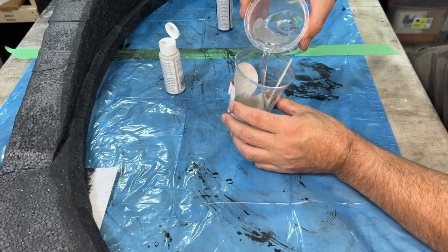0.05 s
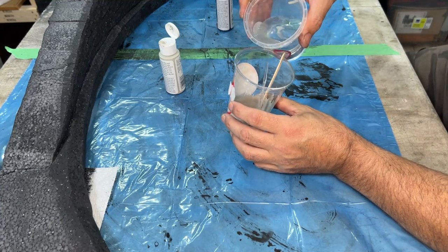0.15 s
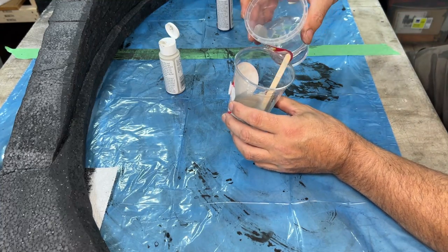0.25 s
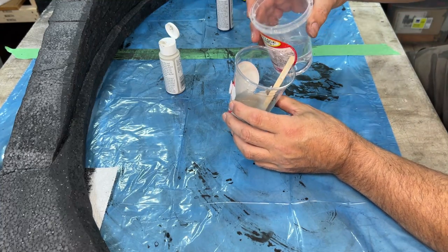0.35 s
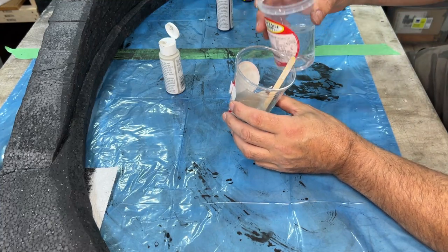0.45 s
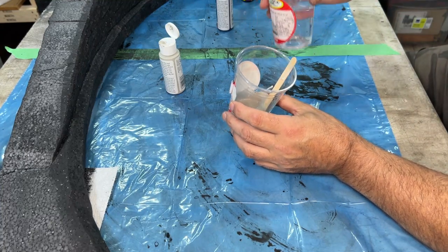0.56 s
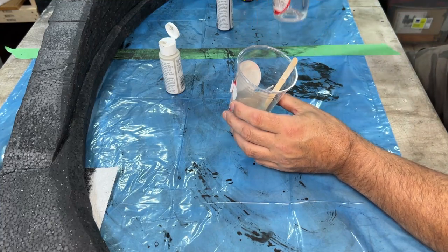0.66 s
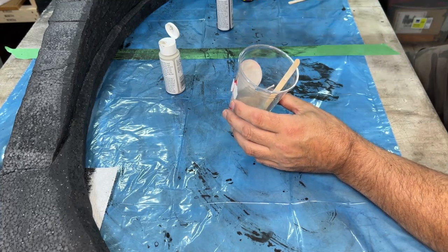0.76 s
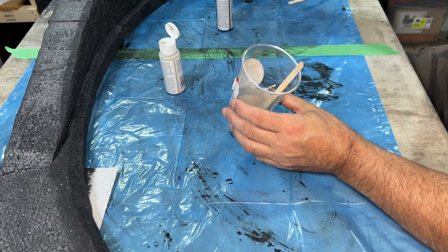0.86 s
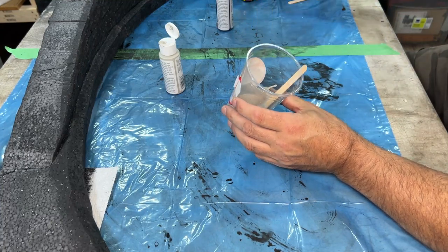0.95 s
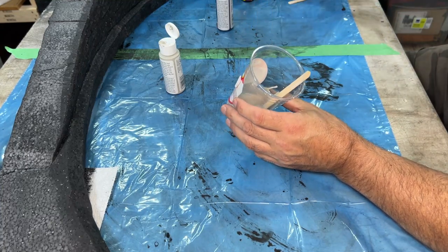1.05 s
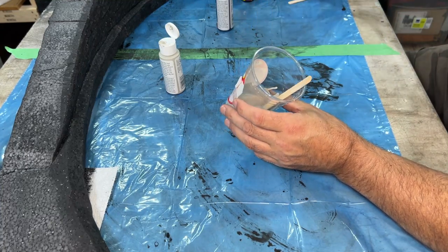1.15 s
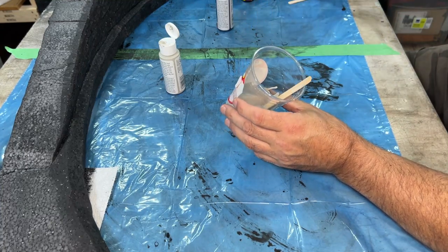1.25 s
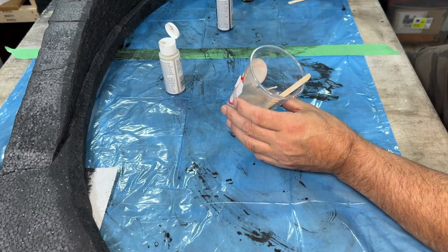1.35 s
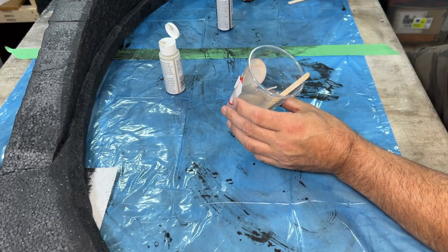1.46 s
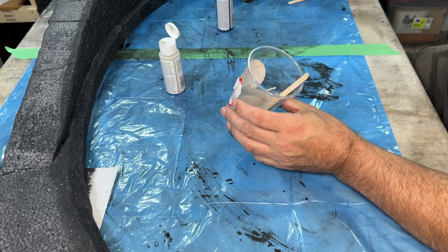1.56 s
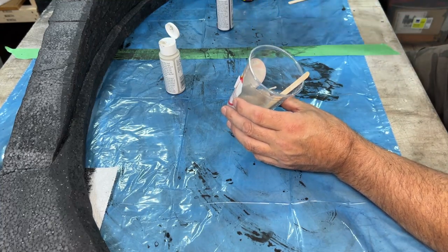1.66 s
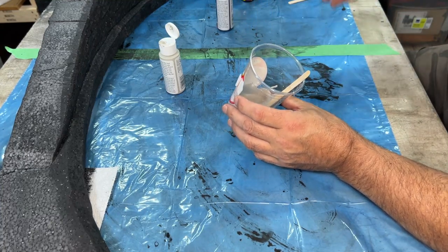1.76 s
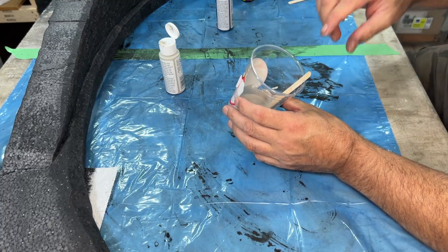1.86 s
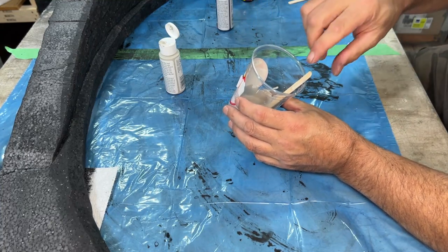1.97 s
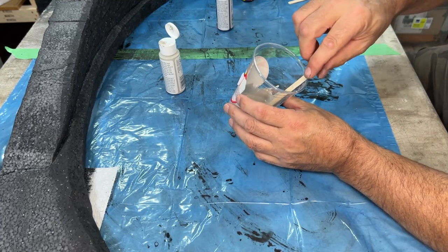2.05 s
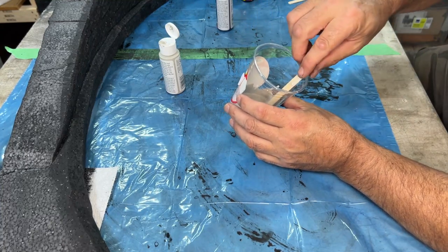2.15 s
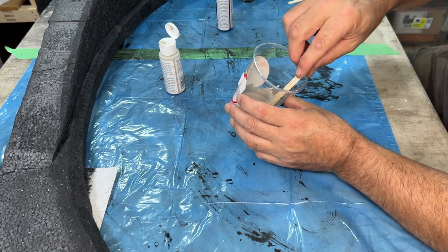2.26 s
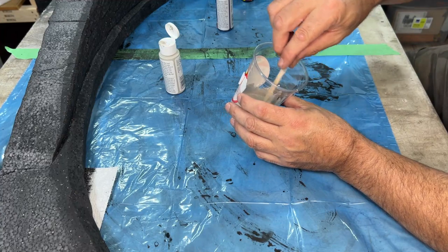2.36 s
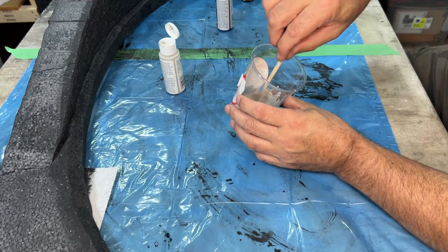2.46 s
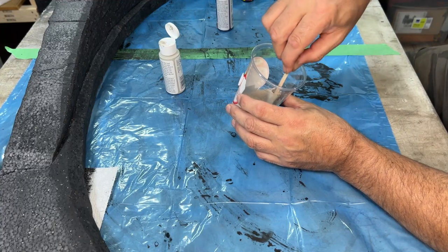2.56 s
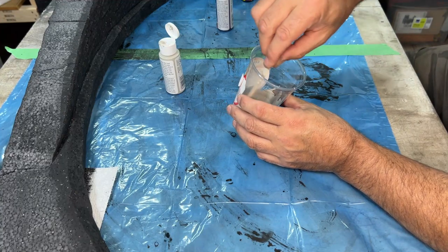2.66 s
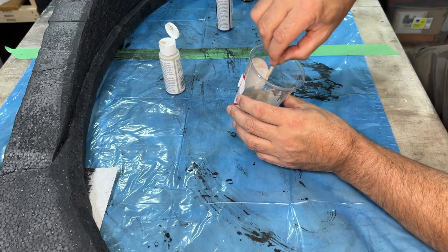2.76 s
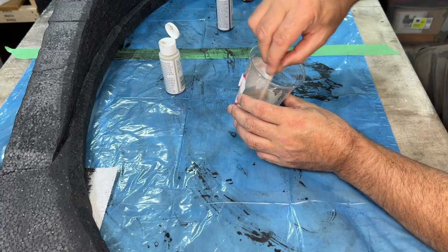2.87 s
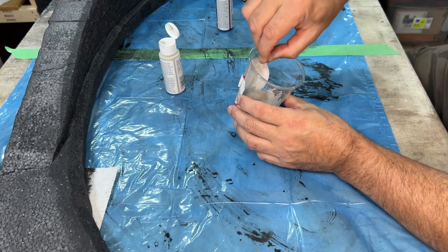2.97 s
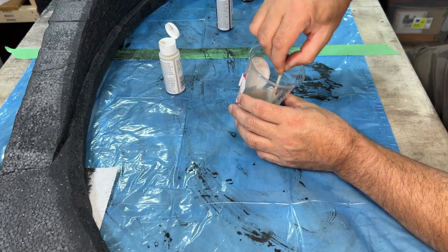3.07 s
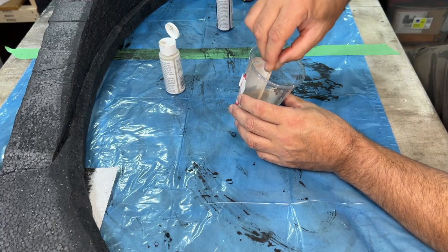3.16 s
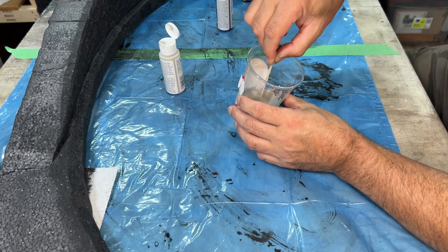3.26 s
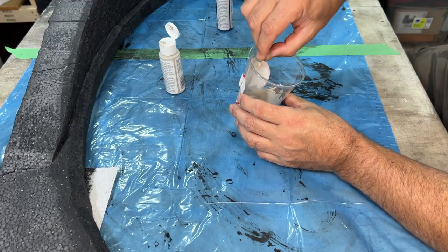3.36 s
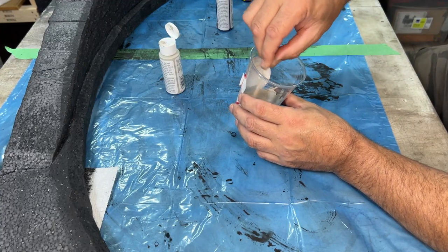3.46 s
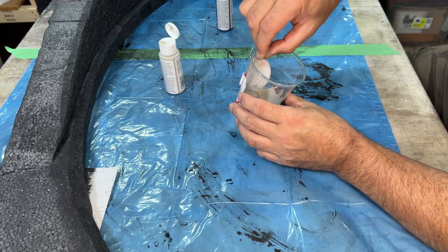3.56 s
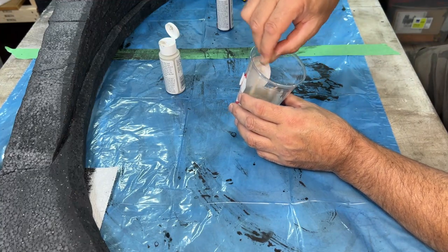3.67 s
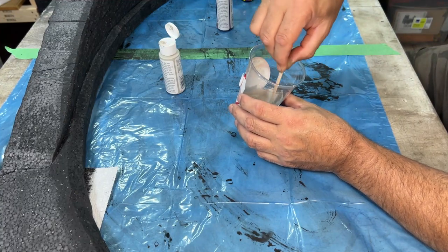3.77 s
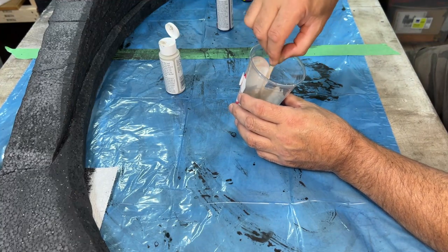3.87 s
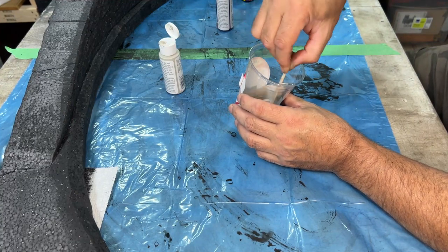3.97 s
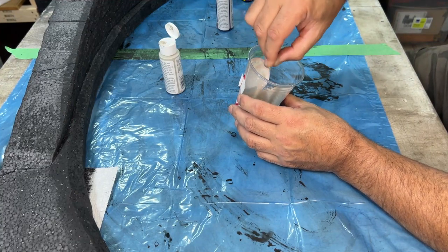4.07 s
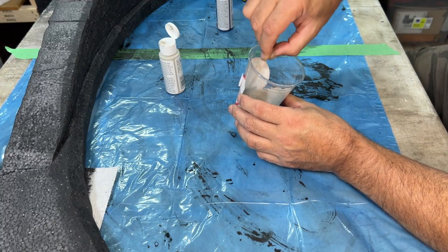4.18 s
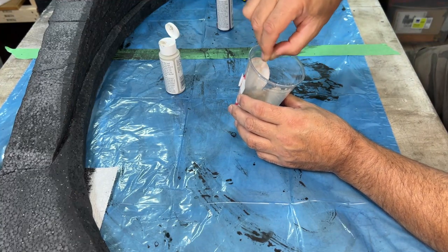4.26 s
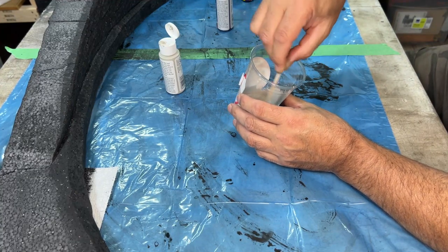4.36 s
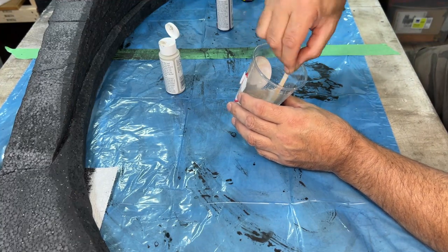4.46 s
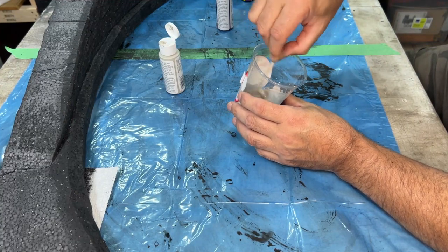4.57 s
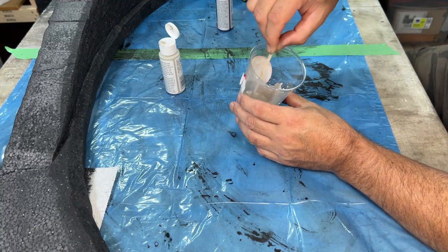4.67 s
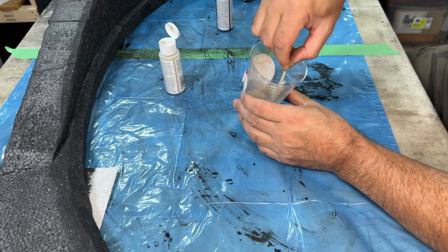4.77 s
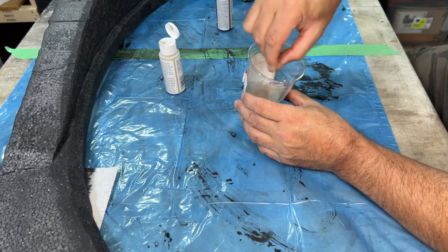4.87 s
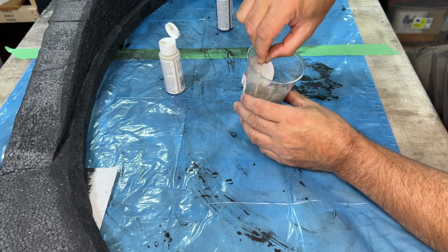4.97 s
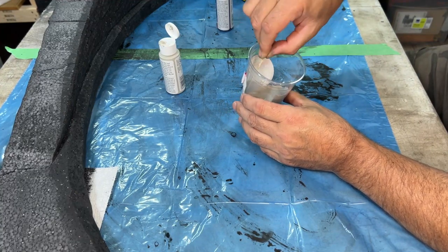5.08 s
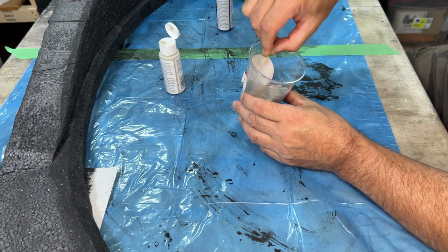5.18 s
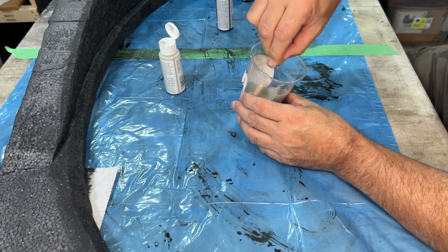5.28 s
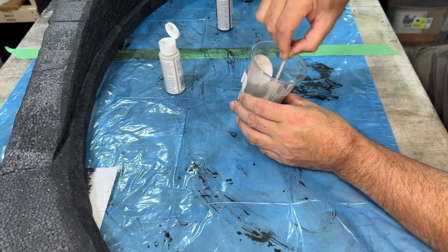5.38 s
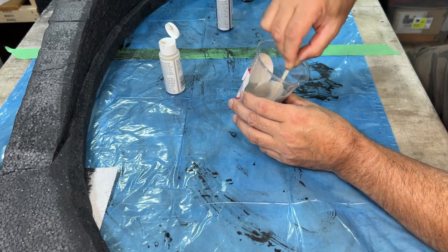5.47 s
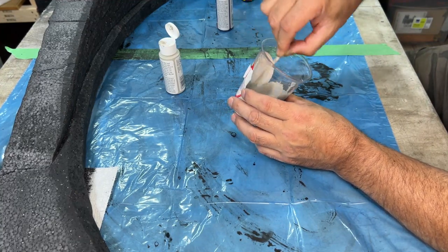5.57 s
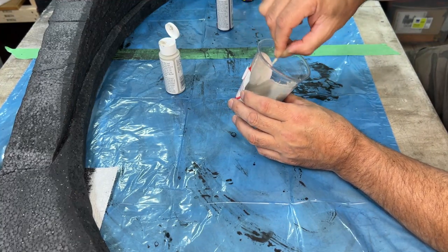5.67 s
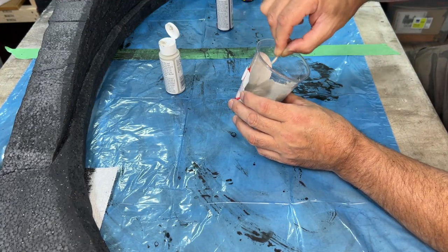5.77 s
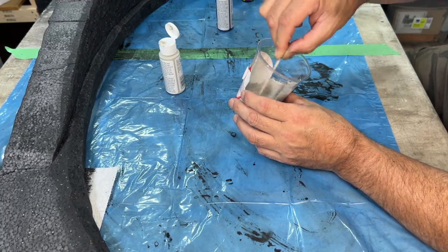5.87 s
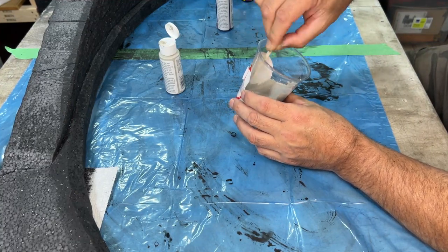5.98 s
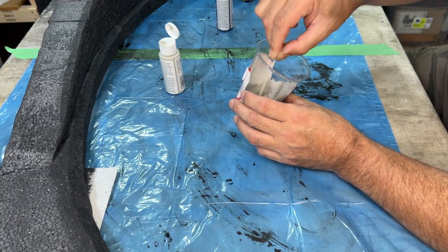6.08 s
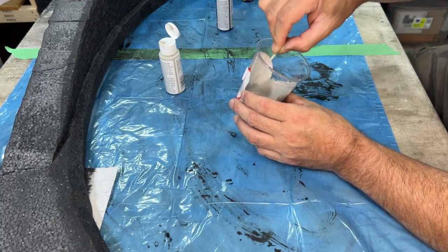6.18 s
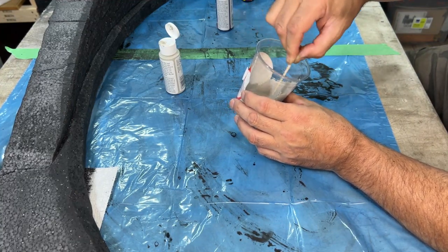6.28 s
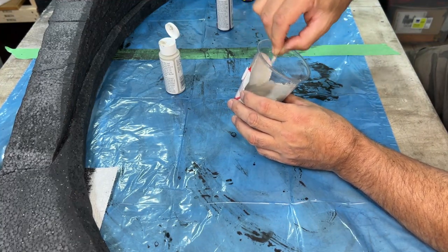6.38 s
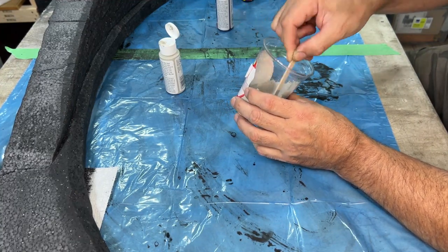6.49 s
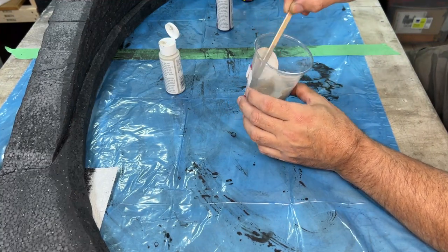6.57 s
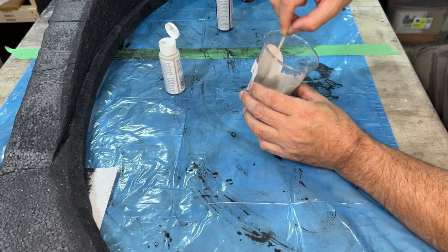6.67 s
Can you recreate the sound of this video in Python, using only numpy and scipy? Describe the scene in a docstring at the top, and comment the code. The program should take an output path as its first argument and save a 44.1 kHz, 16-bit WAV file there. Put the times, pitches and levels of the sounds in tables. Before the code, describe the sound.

In a workshop with a low wavering hum and faint hiss, plastic cup rims tick together a few times, then a dull thud booms on a bench and something scrapes twice. A wooden stick then stirs thin paint in a plastic cup with small hollow knocks, gritty rubs, tiny wet blips and bright ticks. Close, quiet stereo, with a slight short room echo.

```python
"""Stirring paint in a plastic cup

In a humming workshop a wooden stick stirs thin paint in a hand-held plastic cup, heard in stereo.
First the emptied second cup clicks on the rim, is set down with a thud, and something slides twice on a bench.
Then the stick knocks and rubs: touches and grit ring the cup wall's modes and the air in the cup.
Blips and bright ticks of wet paint come in between; hum and hiss are shaped noise."""
import sys
import numpy as np
from scipy import signal
from scipy.fft import rfft, irfft, next_fast_len
from scipy.io import wavfile
from scipy.ndimage import uniform_filter1d

SR = 44100
rng = np.random.default_rng(int(sys.argv[2]) if len(sys.argv) > 2 else 0)


def int16_out(signal):
    """Quantize to a 16-bit WAV file."""
    q = np.round(np.clip(np.atleast_2d(signal).T, -1, 1) * 32767)
    wavfile.write(sys.argv[1], SR, q.astype(np.int16))


N = 296735

# resonances of the plastic cup wall: f/Hz, level/dB, t60/s
CUP_WALL_MODES = [(355, -15, 0.012), (1480, -5.5, 0.0067), (2005, 1.5, 0.007), (2215, -4.5, 0.031),
                  (2445, 1.5, 0.014), (3030, 3.5, 0.0061), (3320, -3.5, 0.016), (3448, -0.5, 0.022),
                  (3860, 1, 0.0067), (4410, -23, 0.1), (4540, -30, .01), (6770, -3.5, 0.0076)]
# strokes of the stick along the wall: t/s, length/s, level/dB
STICK_STROKES = [(2.499, 0.14, -59), (2.818, 0.06, -49), (2.915, 0.19, -52.5), (3.118, 0.077, -58.5),
                 (3.307, 0.12, -54), (3.444, 0.07, -51.5), (3.515, .079, -48), (3.636, 0.043, -45.5),
                 (3.725, 0.057, -48.5), (3.848, 0.018, -48.5), (3.953, 0.034, -47), (4.04, 0.0082, -42.5),
                 (4.122, .032, -57), (4.19, 0.019, -44), (4.318, .045, -51), (4.4, 0.046, -50),
                 (4.486, 0.029, -45), (4.554, .018, -46.5), (4.638, 0.021, -49.5), (4.682, 0.0243, -52),
                 (4.77, 0.12, -49), (4.941, 0.016, -54.5), (5.028, .022, -53), (5.068, 0.031, -56.5),
                 (5.131, 0.11, -56.5), (5.225, 0.023, -48.5), (5.289, 0.052, -55), (5.479, 0.014, -50.5),
                 (5.582, 0.1, -47), (5.751, 0.0095, -51.5), (5.906, 0.016, -53.5), (6.011, 0.055, -49.5),
                 (6.145, 0.013, -48), (6.337, 0.064, -53.5), (6.452, 0.058, -49), (6.709, .028, -56)]


def amp(db):
    """Decibels to amplitude."""
    return 10 ** (np.asarray(db) / 20)


def rms_one(x):
    """Scales a signal to rms 1."""
    return x / np.sqrt(np.mean(x ** 2) + 1e-20)


def in_time(rows):
    """A curve of (t/s, value) rows at every sample."""
    return np.interp(np.arange(N) / SR, *np.transpose(rows))


def at_hz(points, hz):
    """A curve of (f/Hz, value) points, read along log frequency."""
    points_hz, values = np.transpose(points)
    return np.interp(np.log(hz), np.log(points_hz), values)


def drift(rate_hz):
    """Slow chance of spread 1: noise through two equal low-pass poles, made at every 40th sample."""
    r = np.exp(-80 * np.pi * rate_hz / SR)
    slow = signal.lfilter([1], [1, -2 * r, r * r], rng.standard_normal(N // 40 + 2002))
    slow = rms_one(slow[2000:])   # skip the filter's start
    return np.interp(np.arange(N) / 40, np.arange(len(slow)), slow)


def ring(clicks, hz, t60):
    """A resonance: a unit click sets a dying sine of height 1 ringing."""
    r = amp(-60 / (t60 * SR))
    w = 2 * np.pi * hz / SR
    return signal.lfilter([0, np.sin(w)], [1, -2 * r * np.cos(w), r * r], clicks + 1e-18)


def band_pass(x, low_hz, high_hz):
    """Keeps one pitch region."""
    return signal.sosfilt(signal.butter(2, [low_hz, high_hz], "band", fs=SR, output="sos"), x)


def bright(x, low_hz):
    """Keeps what lies above low_hz."""
    return signal.sosfilt(signal.butter(2, low_hz, "high", fs=SR, output="sos"), x)


def coloured(x, spectrum):
    """Shapes a long steady signal to a spectrum in dB per Hz; rms 1."""
    size = next_fast_len(N)
    hz = np.maximum(np.arange(size // 2 + 1) * SR / size, 1)
    return rms_one(irfft(rfft(x, size) * amp(at_hz(spectrum, hz)), size)[..., :N])


def patchy(x, edges_hz, spread_db, rate_hz):
    """Each pitch region between the edges flickers in its own way."""
    return sum(amp(spread_db * drift(rate_hz)) * band_pass(x, low, high)
               for low, high in zip(edges_hz, edges_hz[1:]))


def stereo_noise():
    """White noise, alike left and right in the bass, much less so above and partly opposed at the top."""
    # left-right likeness: f/Hz, correlation
    likeness = [(40, 0.93), (120, 0.94), (300, 0.71), (800, 0.051), (3000, 0.2), (8000, -0.088),
                (14000, -0.34)]
    size = next_fast_len(N)
    mid, side = rfft(rng.standard_normal((2, size)))
    hz = np.maximum(np.arange(len(mid)) * SR / size, 1)
    alike = np.clip(at_hz(likeness, hz), -1, 1)
    return irfft(np.sqrt(1 + alike) * mid + np.sqrt(1 - alike) * side * [[1], [-1]], size)[:, :N]


def grit(smooth):
    """Stereo noise of uneven tiny contacts, over an even share set by smooth; rms 1."""
    lumps = uniform_filter1d(1.0 * (rng.random(N) < .05), size=12)
    return rms_one(stereo_noise() * (lumps + smooth * lumps.mean()))


def stroke_shape(rows, rise_s, fall_db_s):
    """Each stroke swells by 10 dB per rise_s, holds and dies away; overlapping strokes add in power."""
    t, power = np.arange(N) / SR, np.zeros(N)
    for s, length_s, db in rows:
        at = slice(round((s - .03) * SR), round((s + length_s + .3) * SR))
        before = np.maximum(s - t[at], 0)
        after = np.maximum(t[at] - s - length_s, 0)
        power[at] += amp(db - 10 * before / rise_s - fall_db_s * after) ** 2
    return np.sqrt(power)


def contact(length_s, alike, rise):
    """A blow as a short flurry of touches that swells and dies, partly different at each ear; energy 1."""
    t = np.arange(1800) / SR / max(length_s, 2e-4)   # in lengths of the blow
    both, left, right = rng.standard_normal((3, 1800))
    flurry = (alike * both + np.array([left, right])) * np.exp(-t) * (1 - np.exp(-t / rise))
    return flurry / np.sqrt(np.mean(np.sum(flurry ** 2, axis=1)))


def cup_air(push):
    """The air column above the paint, ringing at its own modes."""
    # f/Hz, level/dB, t60/s
    air_modes = [(782, -20, 0.19), (857.4, 4.5, 0.056), (919, -2, 0.046), (973, -15.5, 0.081)]
    return sum(amp(db) * ring(push, hz, t60) for hz, db, t60 in air_modes)


def blows(rows, modes, fall_db_octave, scatter_db, alike, rise, pan_db, slap_db):
    """Rows (s, dB, Hz, air dB, treble dB, s): modes near the blow's own pitch ring most, over a broad slap."""
    hz, level_db, t60 = np.transpose(modes)
    body = np.zeros((len(hz), 2, N + 1800))
    air, top, slap = np.zeros((3, 2, N + 1800))
    for s, db, centre_hz, air_db, top_db, length_s in rows:
        at = slice(round(s * SR), round(s * SR) + 1800)
        hit = contact(length_s, alike, rise) * amp(db + pan_db / 2 * np.array([[1], [-1]]))
        near_db = -np.minimum(fall_db_octave * abs(np.log2(hz / centre_hz)), 16)
        near_db = near_db + rng.normal(0, scatter_db, len(hz))
        body[:, :, at] += amp(level_db + near_db)[:, None, None] * hit
        air[:, at] += amp(air_db) * hit
        top[:, at] += amp(top_db) * hit
        broad = signal.butter(1, [centre_hz / 2, centre_hz * 2], "band", fs=SR)
        slap[:, at] += amp(slap_db) * signal.lfilter(*broad, hit)
    ringing = sum(ring(push, f, decay) for push, f, decay in zip(body, hz, t60))
    return (ringing + cup_air(air) + bright(top, 8900) + slap)[:, :N]


def room_tone():
    """A wavering low hum of machines and a faint hiss in two layers, each noise of a fixed colour."""
    # spectra: f/Hz, level/dB per Hz
    hum_colour, hiss_colour, top_colour = [(15, -55), (25, -24), (41, -11), (63, 3), (85, -3), (115, -7),
                                           (150, -11), (178, -9.5), (210, -15.5), (255, -18), (310, -22.5),
                                           (403, -21.5), (600, -31.5), (900, -49.5)], [(290, -47), (500, -7), (900, 1), (1130, -0.5),
                                                           (1700, -9.5), (2200, -7), (2500, -10.5),
                                                           (2850, -7), (4300, -11), (4870, -6.5),
                                                           (5400, -15), (7000, -17), (9090, -21),
                                                           (12900, -46), (16000, -40)], [(8000, -42), (10500, -6),
                                                                         (12000, 13), (14500, 1),
                                                                         (16000, -9)]
    # levels: t/s, level/dB
    hum_level, hiss_level, top_level = [(0, -49.5), (.58, -52), (1.1, -45.5), (1.45, -53.5), (1.63, -48.5),
                                        (4.8, -49.5), (6.73, -45)], [(0, -50), (.11, -61.5), (.25, -53), (.5, -69),
                                                              (.7, -61.5), (1.57, -64), (1.8, -67.5),
                                                              (2.35, -66), (3.0, -57.5), (3.5, -64),
                                                              (4.5, -58), (5.4, -67.5), (6.73, -62)], [(0, -67), (.45, -81),
                                                                                  (.7, -67), (1.3, -72),
                                                                                  (1.8, -71.5), (2.4, -92),
                                                                                  (2.55, -60), (2.75, -87),
                                                                                  (3.0, -67), (3.6, -68),
                                                                                  (4.3, -100), (6.73, -80)]
    hum = amp(in_time(hum_level) + 1.5 * drift(3.4)) * coloured(stereo_noise(), hum_colour)
    top = amp(in_time(top_level) + 1.5 * drift(7.2)) * coloured(stereo_noise(), top_colour)
    hiss = amp(in_time(hiss_level) + 0.63 * drift(13)) * coloured(stereo_noise(), hiss_colour)
    return hum + top + hiss


def slide():
    """Two pushes across the bench: friction noise, with the narrow rings of the sliding thing on top."""
    # pushes: t/s, length/s, level/dB
    pushes = [(1.915, 0.12, -39), (2.135, .07, -40.5)]
    # friction spectrum: f/Hz, level/dB per Hz
    friction_colour = [(88, -26), (150, 2.5), (286, -2.5), (821, -4), (1020, -22), (1340, 6), (1660, 2.5),
                       (4670, -2.5), (7500, -11), (10000, -18), (11500, -15), (16000, -16)]
    # rings: f/Hz, width/Hz, level/dB
    narrow_rings = [(900, 48, -3.5), (1420, 310, 6.5), (2120, 17, -6), (3090, 19, -6.5), (4710, 37, -4),
                    (5820, 24, -5)]
    rough = grit(smooth=3.0)
    rings = sum(amp(db) * rms_one(ring(rough, hz, np.log(1000) / np.pi / width))   # width to t60
                for hz, width, db in narrow_rings)
    shape = stroke_shape(pushes, rise_s=0.009, fall_db_s=129) * amp(0.58 * drift(33))
    return shape * (coloured(rough, friction_colour) + amp(-12) * rings)


def thud():
    """The cup set down: a knock rings bench and room, with a boom of noise that dies band by band."""
    # boom spectrum: f/Hz, level/dB per Hz
    boom_colour = [(40, -10), (80, -6.5), (124, 1), (250, -2), (480, -1.5), (800, -20), (1300, -9),
                   (1800, -24), (2700, -37.5), (3850, -52), (8000, -59)]
    # boom decay: f/Hz, t60/s
    boom_t60 = [(50, 0.58), (130, 0.63), (350, 0.44), (920, 0.26), (2430, 0.61)]
    # modes of bench and room: f/Hz, level/dB, t60/s
    bench_modes = [(61.4, -23.5, 0.37), (122, -28, 0.24), (180, -28, 0.23), (251.3, -24.5, 0.26),
                   (390, -16, 0.023), (475, -22.5, 0.13), (1240, -15.5, 0.012), (2040, -28.5, 0.021),
                   (2780, -24.5, 0.012)]
    start_s, noise_db = 1.157, -5
    start, out = round(start_s * SR), np.zeros((2, N))
    t = np.arange(SR) / SR
    click = np.zeros(SR)
    click[60:75] = np.hanning(15) / 7   # a soft-edged contact
    boom = sum((-1) ** k * amp(db) * ring(click, hz, t60) for k, (hz, db, t60) in enumerate(bench_modes))
    white = stereo_noise()[:, :SR] * np.array([[amp(.7)], [amp(-.7)]])   # left a little louder
    edges_hz = 35 * 2 ** np.arange(0, 8.1, 1 / 3)   # third-octave bands
    for low, high in zip(edges_hz, edges_hz[1:]):
        hz = np.sqrt(low * high)
        shape = (1 - np.exp(-t * hz / 0.31)) * amp(-60 * t / at_hz(boom_t60, hz))   # lows build up later
        boom = boom + amp(noise_db + at_hz(boom_colour, hz)) * band_pass(white * shape, low, high)
    out[:, start:start + SR] = bright(boom, 40)
    return out


def rim_clicks():
    """Thin plastic rims tick together as the last drops are shaken out: brief touches ring the rim modes."""
    # clicks: t/s, level/dB, centre f/Hz, treble level/dB relative
    clicks = [(0.0177, -30.5, 5770, 19), (0.09, -48.5, 7200, 21.5), (.116, -48, 2000, -9),
              (0.185, -46, 4000, 4), (.207, -47, 3500, 28), (.211, -36.5, 4000, -16),
              (.258, -26.5, 3400, 9), (0.276, -44.5, 3930, -12), (.316, -35.5, 2600, 4)]
    # rim resonances: f/Hz, level/dB, t60/s
    rim_modes = [(952, -8, 0.028), (1580, -24, 0.0099), (2070, -1, .012), (2700, -8, 0.0076),
                 (3580, -5, 0.017), (4140, 3.5, 0.01), (4860, 0.5, 0.0034), (5850, 0.5, .005),
                 (6780, -4, 0.007), (8360, -23, 0.0058)]
    air_db, touch_s = -37, 0.0013
    rows = [(s, db, hz, air_db, top_db, touch_s) for s, db, hz, top_db in clicks]
    return blows(rows, rim_modes, fall_db_octave=4.0, scatter_db=1.5, alike=2, rise=.2, pan_db=0, slap_db=9)


def snaps():
    """Paint film snapping off the stick: tiny bright ticks with a short ring."""
    # t/s, level/dB
    film_snaps = [(0.653, -33), (2.8355, -38.5), (3.172, -26), (3.298, -36), (4.137, -28), (4.191, -27),
                  (4.6443, -34), (4.701, -27), (4.883, -30), (4.952, -33), (5.6727, -20.5), (5.7538, -17),
                  (6.147, -26), (6.2035, -39), (6.338, -27)]
    out = np.zeros((2, N + 1800))
    for s, db in film_snaps:
        out[:, round(s * SR):][:, :1800] += amp(db) * contact(0.001, alike=0.31, rise=0.26)
    return (bright(out, 5400) + amp(-10.0) * ring(out, 6970, 0.0038))[:, :N]


def squeaks():
    """Drips and paint squeezed against the wall: short blips, nearly all rising in pitch."""
    # t/s, level/dB, f/Hz at the height of the blip
    blips = [(.112, -56, 1580), (.1426, -46, 1005), (.185, -41, 1540), (2.929, -48, 1230),
             (3.4624, -40, 3345), (3.576, -34.5, 3610), (4.045, -34, 3440), (4.068, -45, 5660),
             (4.1, -39, 3470), (4.113, -43, 4440), (4.127, -44, 3840), (4.1853, -42, 3500),
             (4.224, -34, 3650), (4.418, -32, 2370), (4.501, -34, 1000), (4.616, -42.5, 3000),
             (4.6788, -32, 2206), (4.819, -42, 4270), (4.8396, -23.5, 2433), (5.1796, -36.5, 3010),
             (5.224, -45, 2500), (6.021, -35, 1500), (6.1469, -49, 2300), (6.3395, -35.5, 2406)]
    peak_s, rasp_share = .0028, 0.28
    out, t = np.zeros((2, N + 900)), np.arange(900) / SR
    swell = t / peak_s * np.exp(1 - t / peak_s)
    for (s, db, hz), (turn, haste) in zip(blips, rng.standard_normal((len(blips), 2))):
        pitch = hz * (1 + (6.1 + 2.5 * haste) * (t - peak_s))
        phase = 2 * np.pi * np.cumsum(pitch) / SR + turn * np.array([[0], [1]])   # right ear turned
        rasp = rms_one(ring(rng.standard_normal((2, 900)), hz * 1.16, 0.0063))   # wet, around the tone
        out[:, round(s * SR):][:, :900] += amp(db) * (np.sin(phase) + rasp_share * rasp) * swell
    return out[:, :N]


def rubbing():
    """The wet stick drags on the wall: grit into the wall modes, the cup air and a smooth treble swish."""
    # spectra of scrape and swish: f/Hz, level/dB per Hz
    scrape_colour, swish_colour = [(150, -30), (350, 4), (580, -40), (1100, 2), (1740, -14.5),
                                   (2400, -17.5), (3500, -2), (5300, -12.5), (7000, -23)], [(3000, -47), (6000, 5), (7000, -4.5), (9400, -5.5),
                                                       (11500, 1), (16000, -6.5)]
    # cup air relative to the wall: t/s, level/dB
    air_level = [(2.5, -6), (3.2, 3), (3.5, -6), (6.73, -3.5)]
    rough = grit(smooth=1.0) * amp(2.32 * drift(28.5))
    # the stick tip travels, so each mode is driven now more, now less
    modes = rms_one(sum(amp(db + 4.0 * drift(11.4)) * ring(rough, hz, t60)
                        for hz, db, t60 in CUP_WALL_MODES))
    scrape = patchy(coloured(rough, scrape_colour), np.geomspace(150, 9000, num=9),
                    spread_db=3.5, rate_hz=28.2)
    wall = rms_one(amp(-5) * modes + scrape)
    swish = patchy(coloured(stereo_noise(), swish_colour), np.geomspace(3000, 18000, num=6),
                   spread_db=3.5, rate_hz=32.0)
    swish = swish * amp(3.1 * drift(35))
    air = amp(in_time(air_level)) * rms_one(cup_air(rough))
    return (stroke_shape(STICK_STROKES, rise_s=0.0073, fall_db_s=294) * wall
            + stroke_shape(STICK_STROKES, rise_s=0.0033, fall_db_s=176) * air
            + amp(-6.5) * stroke_shape(STICK_STROKES, rise_s=0.0036, fall_db_s=380) * swish)


def stick_knocks():
    """Clear knocks on the cup wall, and light taps that come by chance within the strokes."""
    # t/s, level/dB, f/Hz of the wall modes struck most, cup air level/dB relative, length/ms
    clear_knocks = [(2.688, -51.5, 2420, -19, 5.2), (2.818, -35.5, 2980, -3.5, 4.1),
                    (2.863, -51.5, 2190, 13, 7.4), (2.987, -41, 2200, 1.5, 4.3),
                    (3.038, -37.5, 2920, 0, 10.6), (3.084, -55.5, 2230, 10.5, 3.7),
                    (3.138, -41.5, 3270, -4.5, 6.4), (3.299, -49, 2070, -6, 2.3),
                    (3.341, -41.5, 3360, -24, 8.5), (3.465, -39.5, 3330, -6, 10),
                    (3.573, -31, 3480, -5, 4.8), (3.65, -53.5, 3450, 13, 3.8), (3.735, -39, 3140, -2, 10),
                    (3.809, -42, 2270, -2, 4.5), (3.848, -40, 2420, -12, 4.2), (3.953, -49, 3270, -1, 24),
                    (4.043, -31.5, 3674, -11, 6.3), (4.136, -39.5, 3910, -7, 4),
                    (4.187, -29, 3840, -37, 5.5), (4.227, -48, 3470, -6, 3.8),
                    (4.319, -34.5, 1920, -5.5, 3.2), (4.418, -30, 2583, -15, 4.4),
                    (4.499, -35, 3330, -12, 6.3), (4.542, -45.5, 1820, 7, 2.8),
                    (4.577, -28, 1860, -14, 9.5), (4.621, -45, 3154, -23, 3.9),
                    (4.679, -48, 2280, -24, 3.4), (4.841, -32, 2665, -4, 16), (4.946, -49, 3337, -20, 4.1),
                    (5.026, -41, 3320, 0.5, 7), (5.075, -48.5, 1570, 2, 4), (5.171, -35.5, 2180, -3.5, 9.9),
                    (5.226, -39, 2700, -12, 10.7), (5.477, -43, 3300, -4, 4.9),
                    (5.51, -45.5, 2175, -3, 2.8), (5.602, -46.5, 2210, 8.5, 6.6),
                    (5.655, -33, 2210, -15.5, 11.5), (5.713, -49, 2250, 5, 1.9),
                    (5.841, -53.5, 1360, 12.5, 2.75), (6.019, -30.5, 1560, -26, 4.6),
                    (6.051, -48, 1555, 8.5, 3), (6.088, -57, 2460, 14, 2.2), (6.149, -43, 2300, -17, 3.1),
                    (6.185, -58.5, 2890, 10.5, 5.8), (6.34, -61, 2513, -30, 10),
                    (6.471, -39.5, 2090, 2, 4.2), (6.509, -43.5, 2160, 10.5, 7.9)]
    treble_db = 0
    taps_per_s, tap_air_db, tap_s = 25, -0.5, 0.0012
    over_rub_db, spread_db = 1.5, 2.5   # tap level above the stroke's
    rows = [(s, db, hz, air_db, treble_db, ms / 1000) for s, db, hz, air_db, ms in clear_knocks]
    for s, length_s, db in STICK_STROKES:
        for when, chance, pitch, size in rng.random((4, 4)):   # at most four taps a stroke
            if chance < taps_per_s * length_s / 4 and s + length_s < N / SR:
                tap_db = db + over_rub_db + spread_db * (2 * size - 1)
                tap_hz = 1500 + 2400 * pitch
                rows.append((s + when * length_s, tap_db, tap_hz, tap_air_db, treble_db, tap_s))
    return blows(rows, CUP_WALL_MODES, fall_db_octave=12.7, scatter_db=3.0, alike=0.73, rise=1.0,
                 pan_db=-1.1, slap_db=-2.0)


def room(x):
    """The workshop's echoes: feedback delays of unrelated lengths, duller on every round."""
    t60_s, wall_cut_hz = .36, 6000
    size = next_fast_len(N + SR // 2)
    w = 2 * np.pi * np.arange(size // 2 + 1) / size
    dull = 1 / np.sqrt(1 + (w * SR / (2 * np.pi * wall_cut_hz)) ** 2)
    answer = np.zeros((2, len(w)), complex)
    for k, lag in enumerate(rng.uniform(.008, .045, 24) * SR):   # lag in samples
        loop = amp(-60 * lag / SR / t60_s) * dull ** (lag / 2000) * np.exp(-1j * w * round(lag))
        answer[k % 2] += loop / (1 - loop) * (-1) ** (k // 2)   # left and right in turn
    return irfft(rfft(x, size) * answer, size)[:, :N]


def scene():
    """Sums all sources; only rim clicks, knocks, blips and ticks excite the echoes."""
    knocks = stick_knocks() + squeaks() + snaps()
    clicks = rim_clicks()
    wet = room(amp(-12.5) * clicks + amp(-24.5) * knocks)
    return room_tone() + clicks + knocks + wet + thud() + slide() + rubbing()


def out_of_step(x, step_rad):
    """After 4 s all phases are turned, and each pitch region's phase takes a random walk of its own."""
    hz, s, cells = signal.stft(x, SR, nperseg=2048)
    slipping = s > 4
    walk = np.cumsum(rng.standard_normal((24, len(s))) * slipping, axis=1) * step_rad
    place = np.clip(np.log2(np.maximum(hz, 1) / 40) * 2.6, 0, 23)   # 2.6 regions an octave
    phase = np.array([np.interp(place, np.arange(24), column) for column in walk.T]).T
    return signal.istft(cells * np.exp(1j * (phase + 2.35 * slipping)), SR, nperseg=2048)[1][:N]


def record(dry):
    """The right channel slips against the left; the top is cut steeply near 16 kHz."""
    pair = np.array([dry[0], out_of_step(dry[1], step_rad=0.61)])
    return signal.sosfilt(signal.cheby2(14, 70, 16450, fs=SR, output="sos"), pair)


dry = scene()
out = record(dry)
int16_out(out)
```